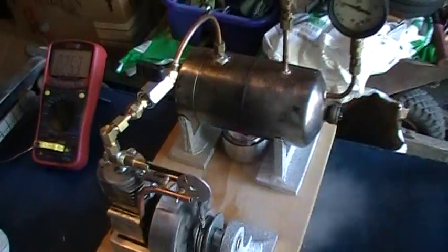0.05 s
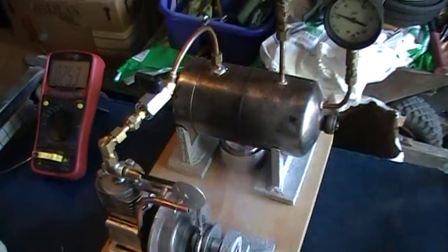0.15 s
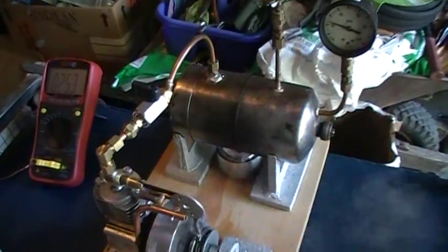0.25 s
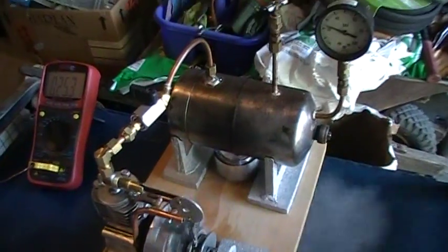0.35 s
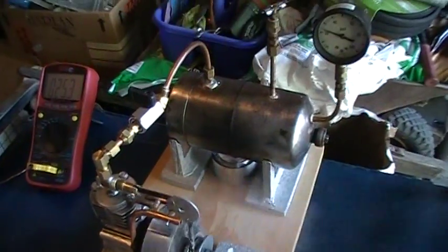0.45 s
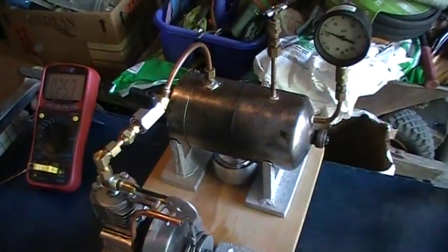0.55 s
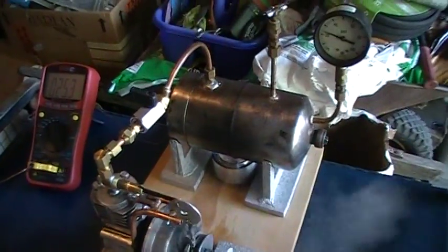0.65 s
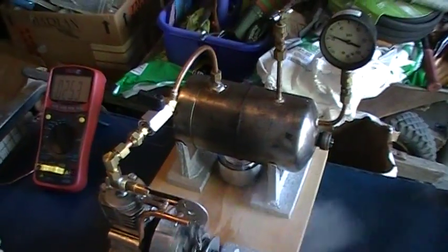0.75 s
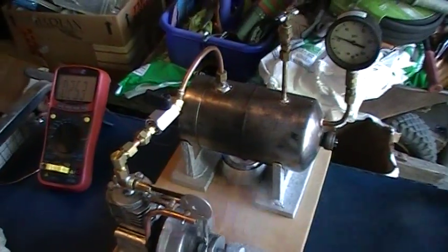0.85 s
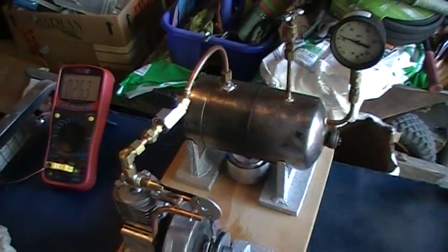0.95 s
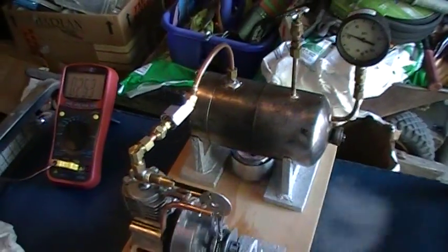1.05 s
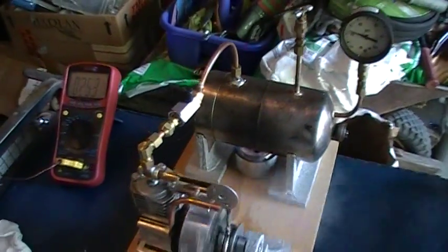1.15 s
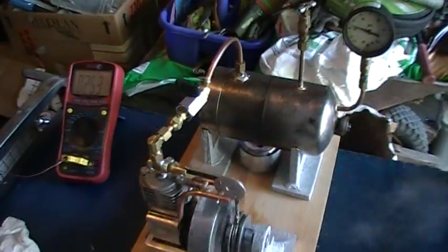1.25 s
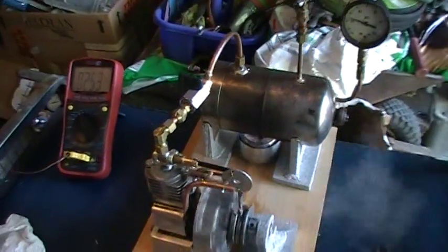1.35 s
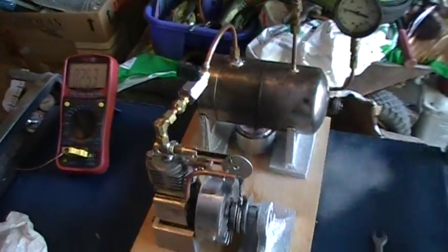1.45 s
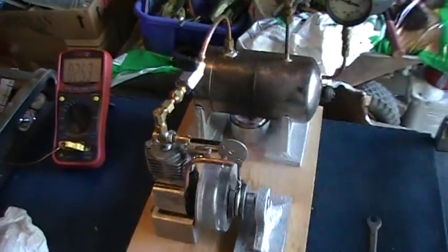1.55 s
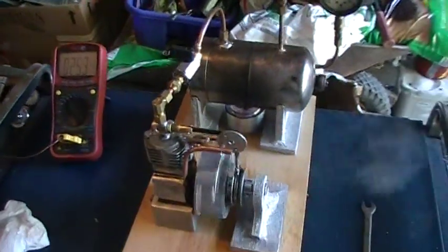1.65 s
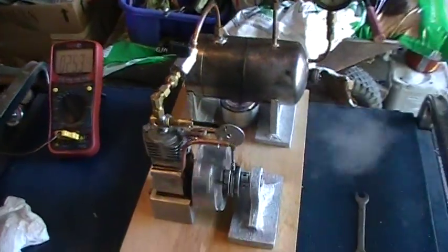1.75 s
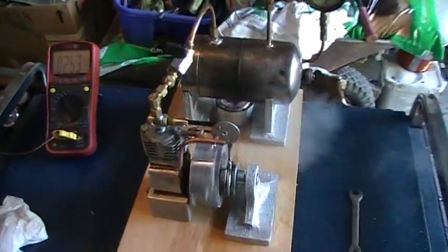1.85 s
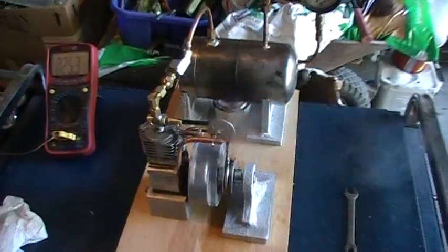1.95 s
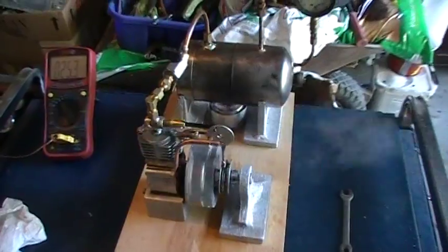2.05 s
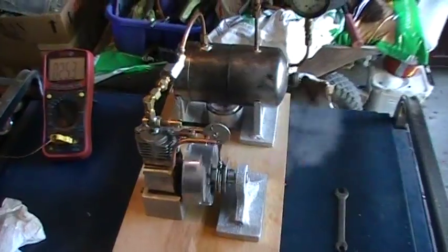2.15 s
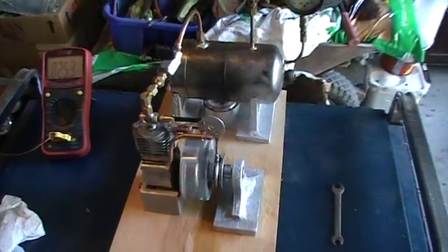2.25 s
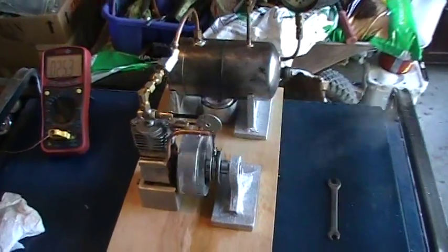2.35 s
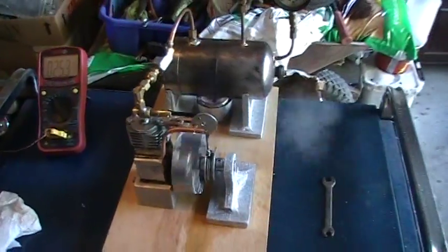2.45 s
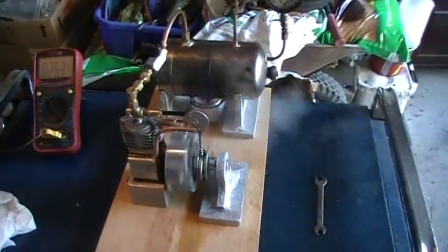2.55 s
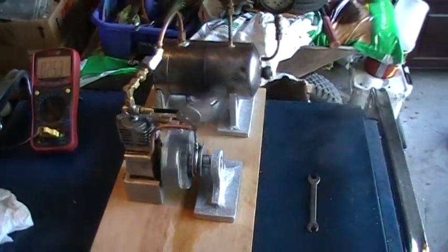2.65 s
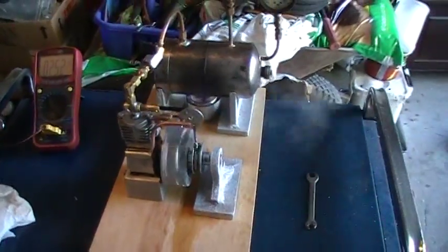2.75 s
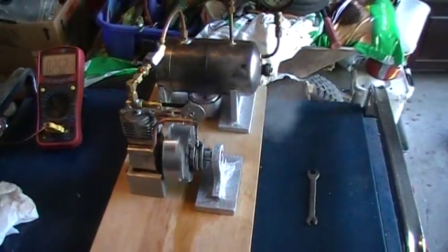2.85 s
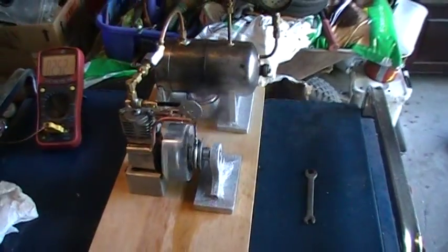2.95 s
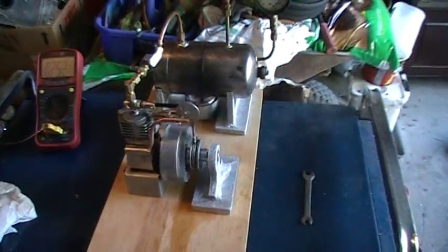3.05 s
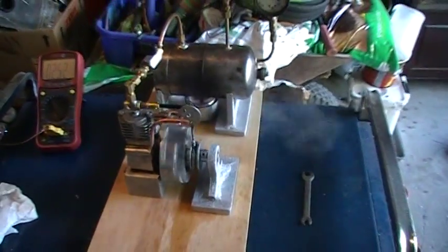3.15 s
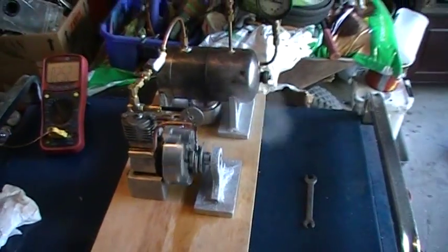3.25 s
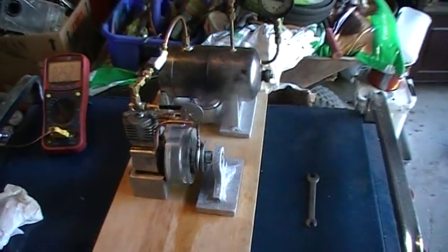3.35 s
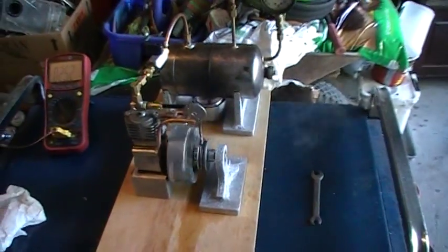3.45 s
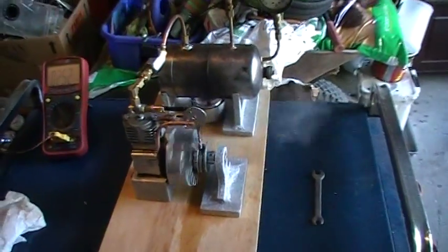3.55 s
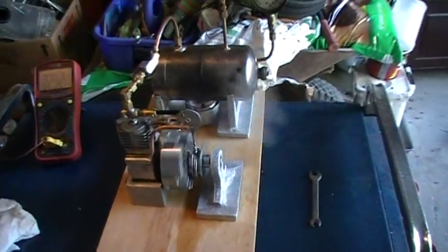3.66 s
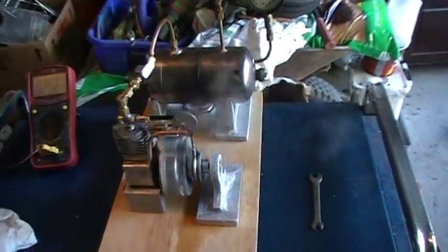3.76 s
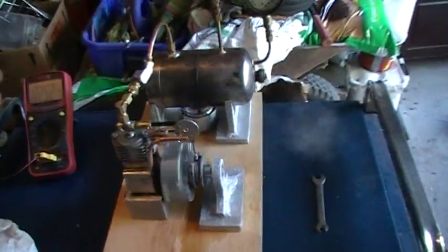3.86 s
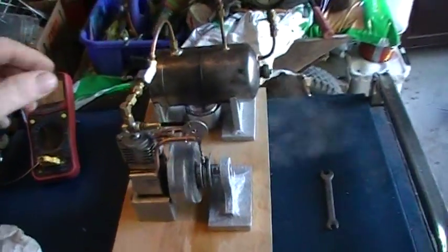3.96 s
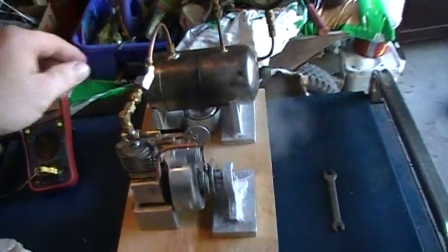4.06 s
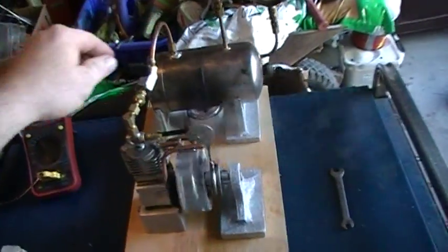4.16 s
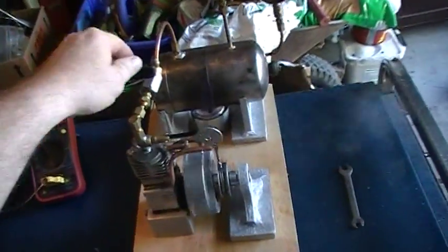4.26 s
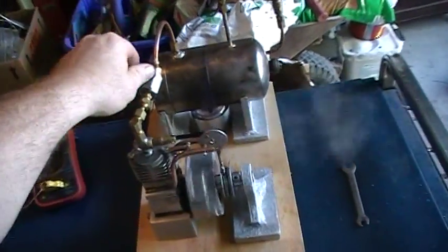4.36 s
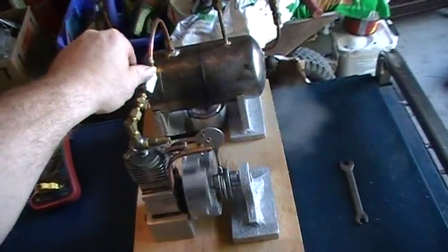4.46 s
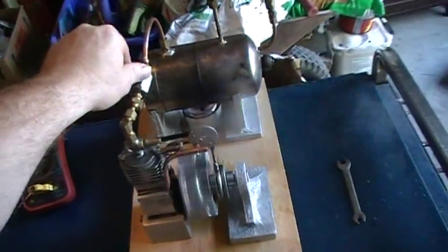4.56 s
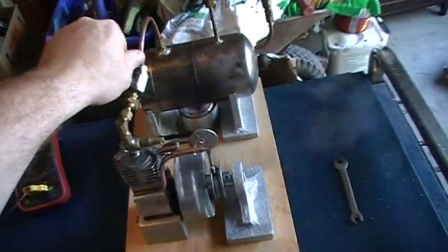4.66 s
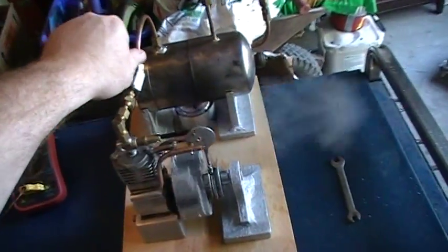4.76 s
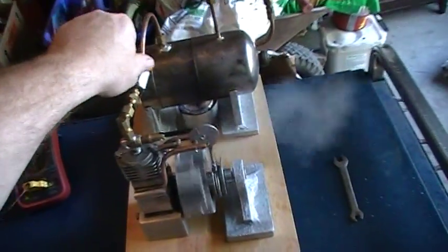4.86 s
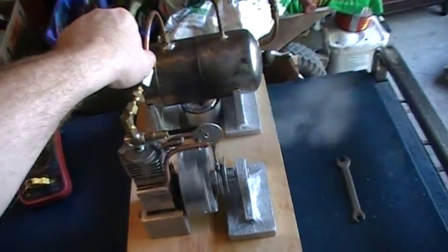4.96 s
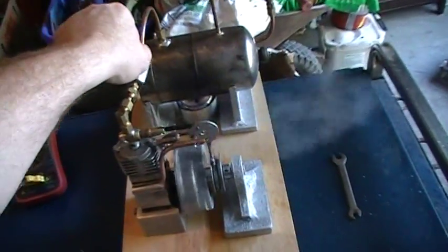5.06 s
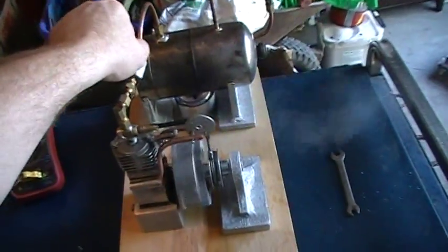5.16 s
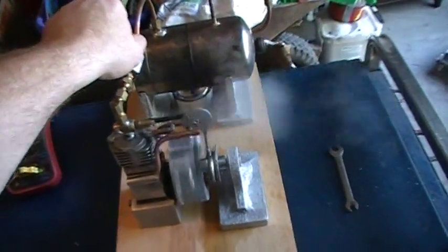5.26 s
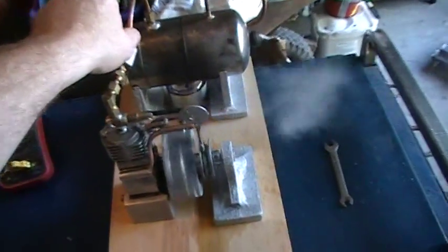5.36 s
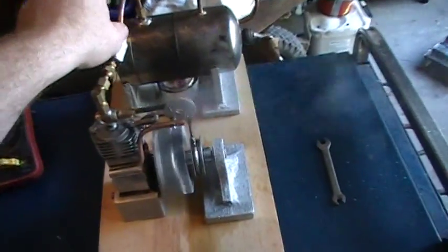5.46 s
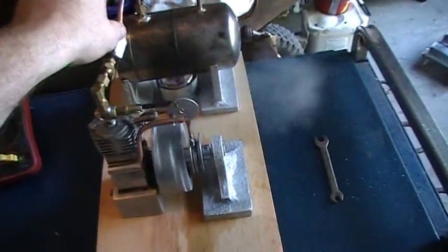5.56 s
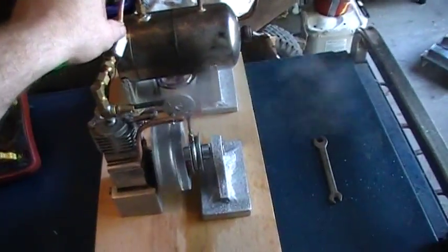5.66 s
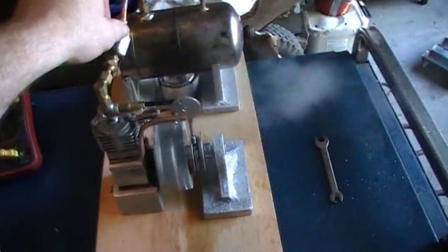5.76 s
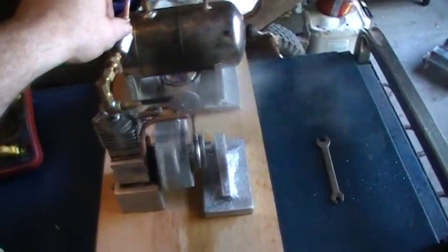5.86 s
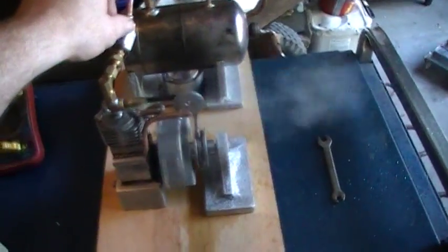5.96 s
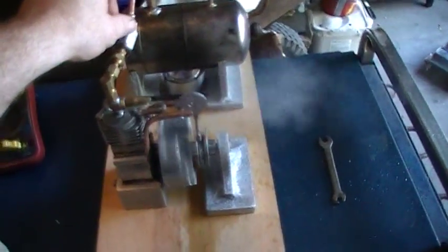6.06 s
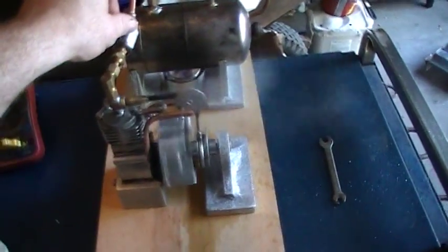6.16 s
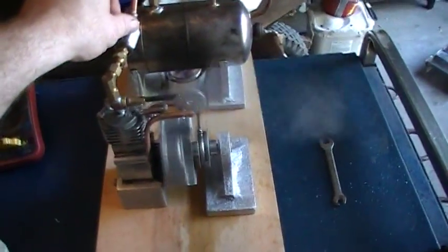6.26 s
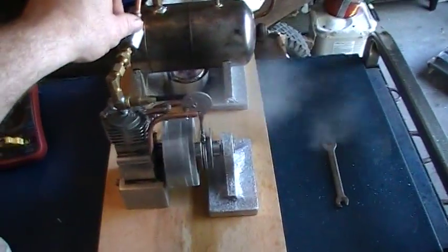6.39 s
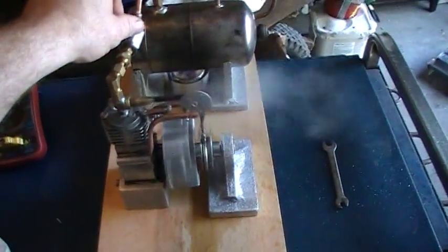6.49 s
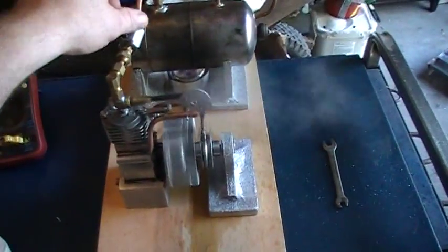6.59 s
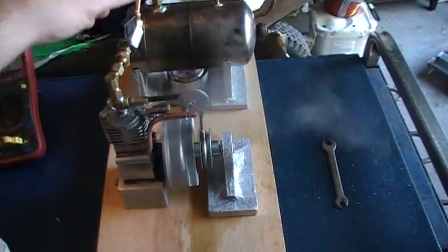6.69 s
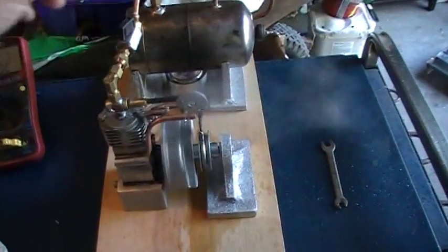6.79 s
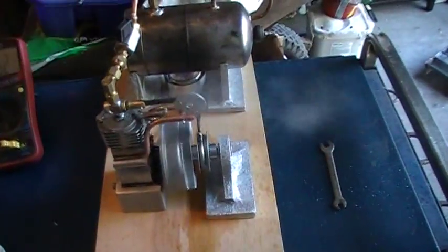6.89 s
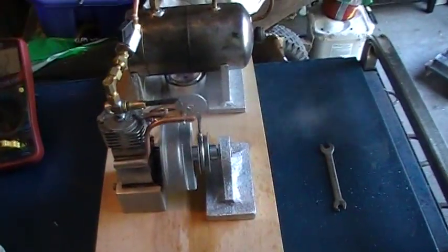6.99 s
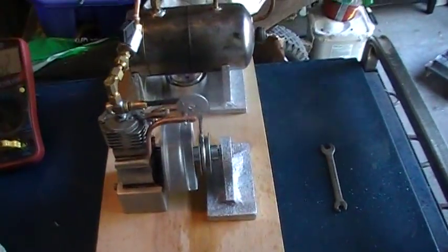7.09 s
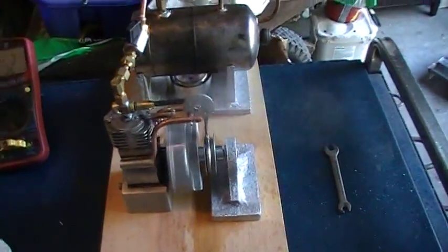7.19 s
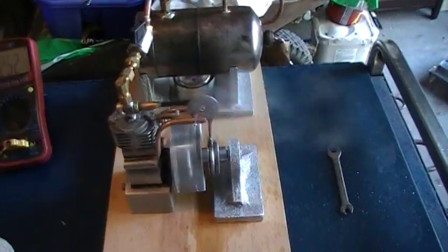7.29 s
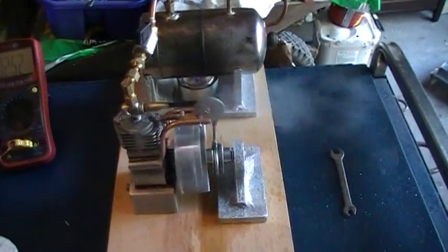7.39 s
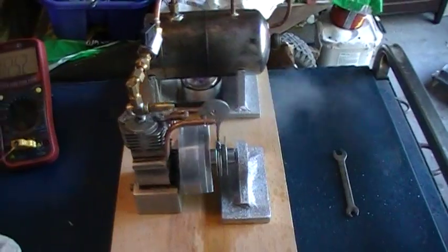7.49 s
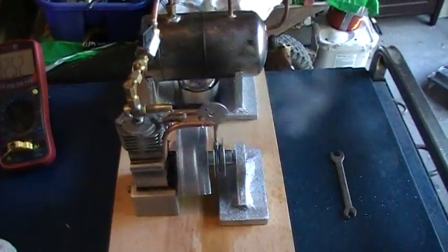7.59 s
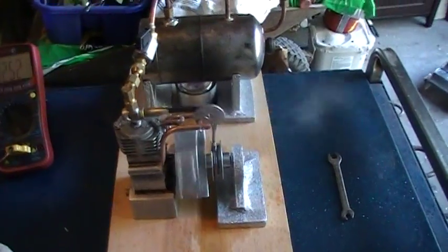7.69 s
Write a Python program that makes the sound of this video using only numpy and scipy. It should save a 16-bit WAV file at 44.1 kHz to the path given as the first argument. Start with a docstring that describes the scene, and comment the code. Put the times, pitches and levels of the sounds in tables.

```python
"""Chuffing steam is heard first: a one-cylinder engine on a bench turns seven times a second, then races to 22.
Each turn lets steam through the port in two humps of flow, which drive a wet turbulent jet and its whistle.
Impacts excite resonances as a valve tick and rod knocks; sliding friction gives the piston's rasp and hiss.
Condensate gurgles as short chirps at idle, and the bearings and crank shake the base board.
An early bench echo and a diffuse workshop tail answer, above the microphones' own faint rumble."""
import sys
import numpy as np
from scipy import signal
from scipy.fft import rfft, irfft, next_fast_len
from scipy.io import wavfile
from scipy.ndimage import map_coordinates

SR = 44100
rng = np.random.default_rng(int(sys.argv[2]) if len(sys.argv) > 2 else 0)


def pcm_store(signal):
    """Save signal as 16-bit PCM."""
    levels = np.round(np.clip(np.atleast_2d(signal), -1, 1) * 32767)
    wavfile.write(sys.argv[1], SR, levels.astype(np.int16).T)


N = 340893
TIME = np.arange(N) / SR
IDLE_TURNS_PER_S = 7.2
INLET_TURNS = .618  # inlet valve opening, in crank turns after the exhaust
CUTOFF_HZ = 15900

# The crank idles, falters as the cock is touched, then races: (time [s], speed [turns/s])
CRANK_SPEED = [(0.0, 7.176), (0.25, 7.119), (1.19, 7.091), (1.8, 7.396), (2.06, 7.037), (4.11, 7.614),
               (4.49, 7.285), (4.64, 5.541), (4.76, 8.699), (5.03, 11.821), (5.27, 13.746), (6.5, 18.706),
               (6.87, 19.834), (7.73, 21.906)]
# Strength of the exhaust steam: (time [s], relative level [dB])
STEAM_STRENGTH = [(0, -19.5), (1.5, -18.5), (2.3, -20), (3.0, -19), (4.4, -18.5), (5.2, -17.5),
                  (6.1, -17.5), (7.0, -18), (7.73, -18.5)]
# Strokes that push out little steam: (time [s], push-out level against a normal stroke [dB])
WEAK_STROKES = [(1.12, -2), (2.1, -1), (3.2, -5), (3.74, -5)]
# Spectrum of the jet noise: (frequency [Hz], relative density [dB per Hz])
JET_SPECTRUM = [(150, -30.5), (600, -8), (1400, -18), (2300, -13.5), (2900, -3), (3500, -6.5), (4300, -1.5),
                (5000, -9.5), (6800, -3.5), (8200, 2), (10200, 1.5), (12000, -8), (15800, -14.5)]
# Resonances of the wet exhaust passage: (frequency [Hz], width [Hz], relative level [dB])
PASSAGE_MODES = [(2900, 400, -8), (4400, 550, -4), (6000, 600, -7), (7900, 500, -3), (10400, 700, -1)]
# Resonances of the base board: (frequency [Hz], width [Hz], relative level [dB])
BOARD_MODES = [(100, 5.8, -21), (163.3, 13, 0.5), (212.7, 12.7, 4.5), (337, 33, -1.5), (434, 33, -13.5)]
# Resonances of the rod and crank pin: (frequency [Hz], width [Hz], relative level [dB])
ROD_MODES = [(570, 70, -3), (722, 60, -4), (870, 45, -2), (965, 140, 2), (1070, 70, -7)]
# Resonances of the cylinder: (frequency [Hz], width [Hz], relative level [dB])
CYLINDER_MODES = [(1331, 84, -4), (1507, 90, -5), (1652, 93, -5), (1882, 156, -3), (2046, 142, -4.5),
                  (2490, 156, -8), (2820, 156, -9.5), (4790, 1560, -14)]
# Resonances of the engine frame: (frequency [Hz], width [Hz], relative level [dB])
FRAME_MODES = [(560, 50, -5), (598, 45, -5.5), (718, 55, -1), (785, 35, -7), (870, 30, -9), (970, 80, -5),
               (1045, 60, -6)]
# Spectrum of the valve tick: (frequency [Hz], relative density [dB per Hz])
TICK_SPECTRUM = [(60, -55), (700, -30), (1500, -5), (2800, 7), (3600, -8), (4500, 3), (6500, -5.5),
                 (9200, 6), (12000, -5), (16000, -29)]
# Spectrum of the sliding hiss: (frequency [Hz], relative density [dB per Hz])
SLIDING_SPECTRUM = [(30, -66), (80, -21), (300, -2), (700, -2.5), (2200, 7), (3400, 0), (4600, -12),
                    (7000, -8.5), (10000, -5), (16000, -34)]
# Friction apart from what speed adds; it eases while the engine falters:
# (time [s], bearing rumble level [dB], piston rasp level [dB])
FRICTION = [(0, -45.5, -42.5), (1.2, -44.5, -43), (1.7, -43.5, -40), (2.6, -48.5, -43), (3.2, -46.5, -39.5),
            (3.9, -48.5, -42), (4.4, -42, -38.5), (4.64, -47.5, -43), (4.8, -45, -42), (6.5, -44.5, -40.5),
            (7.73, -43, -44)]
# Piston friction around one turn at idle: (crank angle [turns], relative level [dB])
RUBBING = [(0, 6), (.15, 4.5), (.28, 3), (.4, -4.5), (.58, -8.5), (.64, 7), (.78, -5.5), (.92, 3), (1, 4)]
# Loudest gurgles of condensate in the cylinder: (time [s], relative level [dB], frequency [Hz])
LOUD_GURGLES = [(0.135, -31.5, 1330), (0.654, -31, 1960), (1.121, -26.5, 2580), (1.772, -29, 1930),
                (1.935, -32, 1355), (3.158, -31.5, 1370), (3.324, -28, 1352), (4.53, -26, 1337),
                (4.687, -26.5, 1812)]
# Hum of the shaking base: (frequency [Hz], relative level of a crank harmonic there [dB])
HUM_RESPONSE = [(20, -48), (45, -35), (62, -20), (82, -9), (103, 0), (125, -11), (145, -7), (166, 5),
                (188, -6), (214, 3), (245, -7), (285, -11), (325, -7), (370, -11), (450, -11)]
# Decay of the workshop's reverberation: (frequency [Hz], 60 dB decay time [s])
ROOM_T60 = [(100, 0.063), (1000, 0.17), (5000, 0.3), (9000, 0.3), (15000, 0.18)]
# Breadth of the reverberation: (frequency [Hz], side against mid level [dB])
ROOM_WIDTH = [(100, 6), (300, 4), (700, -4.5), (2000, -11), (5000, -10.5), (8000, -10), (11000, 7.5),
              (15000, 3)]
# Spectrum of the microphones' own faint rumble: (frequency [Hz], relative density [dB per Hz])
SELF_NOISE_SPECTRUM = [(20, -13), (45, 2), (100, -1), (300, -5), (2000, -20), (16000, -34)]
# Colour of the microphone pair: (frequency [Hz], left minus right level [dB])
EAR_DIFFERENCE = [(40, -3), (90, -1.1), (450, -1.5), (850, 0.2), (1050, 2.5), (2000, -0.5), (3000, 2),
                  (5000, 0), (7300, -0.5), (8300, 4.5), (9600, -1), (10700, -1), (13000, -1)]


def from_db(db):
    """Amplitude ratio by the decibel law."""
    return 10 ** (np.asarray(db) / 20)


def rms_one(x):
    """Normalisation to unit root-mean-square amplitude."""
    return x / np.sqrt(np.mean(x ** 2) + 1e-20)


def read(rows, at):
    """Linear interpolation of every column of a table against its first."""
    first, *columns = np.transpose(rows)
    return [np.interp(at, first, c) for c in columns]


def at_hz(points, hz):
    """Linear interpolation of a spectrum on a log-frequency axis."""
    known_hz, values = np.transpose(points)
    return np.interp(np.log(hz + 1), np.log(known_hz), values)


def filtered(x, order, edge_hz, kind="low"):
    """Causal Butterworth filtering: a maximally flat pass band."""
    return signal.sosfilt(signal.butter(order, edge_hz, kind, fs=SR, output="sos"), x)


def coloured(x, spectrum):
    """Spectral shaping by multiplication in the frequency domain; rms 1."""
    size = next_fast_len(N)
    gain = from_db(at_hz(spectrum, np.fft.rfftfreq(size, 1 / SR)))
    return rms_one(irfft(rfft(x, size) * gain, size)[:N])


def drift(rate):
    """Slow random modulation: about `rate` new values a second, joined by lines; rms 1."""
    knots = np.arange(0, N / SR + 1, 1 / rate)
    return rms_one(np.interp(TIME, knots, rng.standard_normal(len(knots))))


def resonate(x, hz, width_hz):
    """A damped two-pole resonator with gain 1 at its peak."""
    r = np.exp(-np.pi * width_hz / SR)
    zeros = np.array([1, 0, -1]) * (1 - r * r) / 2
    poles = [1, -2 * r * np.cos(2 * np.pi * hz / SR), r * r]
    return signal.lfilter(zeros, poles, x + 1e-18)


def body(force, modes, vary_db):
    """Modal superposition: the share of each mode wanders with the point of contact."""
    total = 0
    for k, (hz, width_hz, db) in enumerate(modes):
        share = from_db(vary_db * drift(25))
        total = total + (-1) ** k * from_db(db) * resonate(force * share, hz, width_hz)
    return total


def clicks(times, db):
    """Ideal impacts: one single-sample impulse at each time."""
    out, at = np.zeros(N), np.round(times * SR).astype(int)
    inside = (at >= 0) & (at < N)
    out[at[inside]] = from_db(db)[inside]
    return out


def grains(per_s, spread_db):
    """Shot noise: random tiny impacts of uneven size and sign; rms 1."""
    sizes = from_db(spread_db * np.minimum(rng.exponential(1, N), 4))
    sizes = sizes * rng.choice([-1, 1], N)
    return rms_one(sizes * (rng.random(N) < per_s / SR))


def crank():
    """Rotation as integrated speed: turn starts, periods, angle [turns] and speed [octaves above idle]."""
    turns_per_s, = read(CRANK_SPEED, TIME)
    turns = np.cumsum(turns_per_s) / SR
    starts = np.interp(np.arange(int(turns[-1]) + 1), turns, TIME)
    periods = np.append(np.diff(starts), 1 / turns_per_s[-1])
    return starts, periods, turns % 1, np.log2(turns_per_s / IDLE_TURNS_PER_S)


def exhaust(flow, speed, jet_db=-3.5, spit_db=-7, sputter_db=0.65,
            whistle_db=1.0, whistle_db_per_octave=-3, roar_db=-19):
    """Jet turbulence: the flow through the port modulates a wet jet, its whistle and a roar."""
    flow = flow * from_db(sputter_db * (drift(600) - 1 / 2))
    # droplets of condensate crackle in the jet
    droplets = from_db(spit_db) * grains(per_s=2500, spread_db=-2.5)
    jet = coloured(rng.standard_normal(N) + droplets, JET_SPECTRUM)
    # water in the passage keeps changing the colour of the chuffs
    wet = rms_one(body(rng.standard_normal(N), PASSAGE_MODES, vary_db=3.0))
    jet = rms_one(jet + from_db(-5) * wet)
    # at speed the whistle fades and a lower roar grows
    tone = from_db(whistle_db + whistle_db_per_octave * speed) * whistle(speed)
    roar = rms_one(resonate(rng.standard_normal(N), hz=4170, width_hz=8100)) * np.maximum(speed, 0)
    return flow * (from_db(jet_db) * (jet + tone) + from_db(roar_db) * roar)


def port_flow(starts, periods, speed, blowdown_db=2.0, push_db=-0.47, push_db_per_octave=-2,
              blowdown_vary_db=.4, push_vary_db=0.3, leak_db=-22, leak_turns=0.18, lead_s=0.00082):
    """Periodic flow: a two-humped chuff each turn, slightly varied, with a dying leak past the valve."""
    flow, weak_db = np.zeros(N), np.zeros(len(starts))
    for s, db in WEAK_STROKES:
        weak_db[np.argmin(np.abs(starts - s))] = db
    chances = rng.standard_normal((len(starts), 2))
    for start, period, weak, chance in zip(starts, periods, weak_db, chances):
        near = slice(max(int((start - lead_s) * SR), 0), int((start + period) * SR))
        t, fast = TIME[near] - start + lead_s, max(np.interp(start, TIME, speed), 0)
        turn_s = 1 / (IDLE_TURNS_PER_S * 2 ** fast)
        first_gain = from_db(blowdown_db + blowdown_vary_db * chance[0])
        second_gain = from_db(push_db + push_db_per_octave * fast + push_vary_db * chance[1] + weak)
        leak = from_db(leak_db) * np.exp(-t / (leak_turns * turn_s))
        humps = first_gain * blowdown(t, turn_s, fast) + second_gain * push_out(t / turn_s, fast)
        flow[near] += humps + leak
    return flow * from_db(read(STEAM_STRENGTH, TIME)[0])


def blowdown(t, period, fast, attack_s=0.0044, hold_turns=0.069, hold_turns_per_octave=0.04, decay_s=0.0052):
    """Pressure relief at the opening port: attack, hold and exponential decay."""
    hold_s = (hold_turns + hold_turns_per_octave * fast) * period
    return np.clip(t / attack_s, 0, 1) * np.exp(-np.maximum(t - hold_s, 0) / decay_s)


def push_out(turns, fast, peak_turns=0.29, swell_turns=0.057, close_turns=0.027, late_turns_per_octave=0.033):
    """Displacement flow: the returning piston drives out the rest until the port closes on it."""
    past = turns - peak_turns - late_turns_per_octave * fast
    return np.exp(-(past / np.where(past < 0, swell_turns, close_turns)) ** 2 / 2)


def whistle(speed, centre_hz=9220, sag_hz_per_octave=60, waver_hz=260, waver_hz_per_octave=150, width_hz=520):
    """Narrow-band turbulence: the port's ragged whistle, its centre wavering at random; rms 1."""
    waver = (waver_hz + waver_hz_per_octave * np.abs(speed)) * drift(45)
    hz = centre_hz - sag_hz_per_octave * speed + waver
    noise = rng.standard_normal(N) + 1j * rng.standard_normal(N)
    turbulence = filtered(noise, 2, width_hz / 2)
    # a complex carrier shifts the band up to its centre
    return rms_one(np.real(turbulence * np.exp(2j * np.pi * np.cumsum(hz) / SR)))


def thumps(starts, speed, open_db=-15, rise_db=2.0, soft_hz=220, low_hz=70, board_db=5):
    """Impulse response: the pressure step at port opening radiates and rings the base board."""
    opening = clicks(starts, open_db + rise_db * np.interp(starts, TIME, speed))
    pulses = filtered(opening + 1e-18, 2, [low_hz, soft_hz], "band")
    return pulses + from_db(board_db) * body(opening, BOARD_MODES, vary_db=1)


def knocks(starts, periods, speed, knock_db=-0.5, inertia_db=4.5, clank_db=-7,
           return_turns=.455, return_db=1, chime_db=9):
    """Impact excitation: steam takes up the rod's slack with one bounce; each turn it also closes back,
    harder at speed."""
    slack_s, bounce_s, bounce_db = .004, .0042, -9
    fast = np.maximum(np.interp(starts, TIME, speed), 0)
    chance = rng.standard_normal((len(starts), 5))
    times = starts + INLET_TURNS * periods + slack_s + .0001 * chance[:, 0]
    # inertia makes the blow grow steeply with speed
    level_db = knock_db + inertia_db * fast ** 3 + 0.49 * chance[:, 1]
    bounces = clicks(times + bounce_s + .0001 * chance[:, 2], level_db + bounce_db)
    blows = clicks(times, level_db) + bounces
    thud = body(blows, ROD_MODES, vary_db=.5)
    return_times = starts + return_turns * periods + .0004 * chance[:, 3]
    returns = clicks(return_times, return_db + 9 * (fast - 1) + 2 * chance[:, 4])
    # the return blow sets the flywheel ringing
    chime = from_db(chime_db) * resonate(returns, 1954, 40)
    clank_force = from_db(clank_db) * blows * from_db(-7 * speed) + returns
    return thud + chime + body(clank_force, CYLINDER_MODES, vary_db=2.5)


def valve(starts, periods, speed, tick_db=-41, rise_db=10, tick_decay_s=0.0023):
    """Transient noise burst: the inlet valve snaps open with a short spit, harder at speed."""
    times = starts + INLET_TURNS * periods
    level_db = tick_db + rise_db * np.interp(times, TIME, speed) + rng.normal(0, 1.7, len(times))
    decay = np.exp(-1 / (tick_decay_s * SR))
    envelope = signal.lfilter([2], [1, -decay], clicks(times, level_db))
    return envelope * coloured(rng.standard_normal(N), TICK_SPECTRUM)


def running_gear(angle, speed):
    """Radiation efficiency: parts as small as piston and bearings radiate little bass."""
    return filtered(piston(angle, speed) + bearings(speed), 4, 130, "high")


def piston(angle, speed, rasp_db_per_octave=7, evening=0.57, rasp_top_hz=3500, hiss_db=-6, hiss_db_per_octave=9):
    """Sliding friction: rasp and hiss in the cylinder, louder and more even as the speed rises."""
    piston_db = read(FRICTION, TIME)[1]
    stroke_db = read(RUBBING, angle)[0] * (1 - evening * speed) + 2 * drift(70)
    contacts = grains(per_s=1500, spread_db=2.5) * from_db(stroke_db)
    scraping = body(contacts, CYLINDER_MODES, vary_db=0.0)
    rasp = from_db(rasp_db_per_octave * speed) * rms_one(filtered(scraping, 2, rasp_top_hz))
    hiss_gain = from_db(hiss_db + hiss_db_per_octave * speed + stroke_db / 2)
    hiss = hiss_gain * coloured(rng.standard_normal(N), SLIDING_SPECTRUM)
    return from_db(piston_db) * (rasp + hiss)


def bearings(speed, rumble_db_per_octave=6.5, drone_db=-53, drone_db_per_octave=-3, falter_db_per_octave=18):
    """Structure-borne friction: rumble in the frame and a board drone that drops as the crank falters."""
    rumble_gain = from_db(read(FRICTION, TIME)[0] + rumble_db_per_octave * speed)
    rumble = rms_one(body(grains(per_s=1800, spread_db=2.5), FRAME_MODES, vary_db=2.0))
    level_db = drone_db + drone_db_per_octave * speed + falter_db_per_octave * np.minimum(speed, 0)
    drone = rms_one(body(rng.standard_normal(N), BOARD_MODES, vary_db=1.0))
    return rumble_gain * rumble + from_db(level_db) * drone


def gurgles(squirts, gurgle_db=-1, length_s=0.0043, waver=0.045, grit=0.45):
    """Frequency modulation: water squeezed past the piston gives short wavering chirps with grit."""
    out, wobble = np.zeros(N), drift(350)
    rough = rms_one(body(rng.standard_normal(N), CYLINDER_MODES, vary_db=0))
    for s, db, hz in squirts:
        near = slice(max(int((s - .02) * SR), 0), int((s + .02) * SR))
        swell = np.exp(-((TIME[near] - s) / length_s) ** 2 / 2)
        chirp = np.sin(2 * np.pi * np.cumsum(hz * (1 + waver * wobble[near])) / SR)
        out[near] += from_db(db + gurgle_db) * swell * (chirp + grit * rough[near])
    return out


def small_gurgles(starts, periods, level_db=-36, spread_db=2, low_hz=1350, high_hz=2500, high_share=.35):
    """Random excitation: each slow power stroke squeezes out a squirt, mostly near the lowest resonance."""
    late, size, pitch = rng.random((len(starts), 3)).T
    times = starts + periods * (INLET_TURNS + (1 - INLET_TURNS) * late)
    hz = low_hz * (high_hz / low_hz) ** np.maximum(1 - pitch / high_share, 0)
    slow = periods > 1 / 10
    return np.transpose([times, level_db + spread_db * (2 * size - 1), hz])[slow]


def hum(angle, speed, idle_db=-80, db_per_octave=18.0, jolt_turns=0.202, scatter_cycles=0.12, count=18):
    """Forced vibration: harmonics of the unbalanced crank climb through the board's resonances."""
    level_db, turns_per_s = idle_db + db_per_octave * speed, IDLE_TURNS_PER_S * 2 ** speed
    total = 0
    for k in range(1, count + 1):
        gain = from_db(level_db + at_hz(HUM_RESPONSE, k * turns_per_s))
        cycles = k * (angle - jolt_turns) + scatter_cycles * rng.standard_normal()
        total = total + gain * np.cos(2 * np.pi * cycles)
    return total


def bench(x, echo_db=-8, delay_s=0.0009086, sway_s=.00012, ear_gap_s=.00001):
    """Early reflection: the bench top echoes with a swaying delay, giving shifting comb interference."""
    delay = delay_s + sway_s * drift(1.2)
    sides = []
    for side in (-1, 1):
        echo = map_coordinates(x, [(TIME - delay - side * ear_gap_s) * SR], order=3)
        sides.append(x + from_db(echo_db) * echo)
    return np.array(sides)


def workshop(x, treble_db=-12):
    """Diffuse reverberation: convolution with noise whose decay and stereo breadth vary by band."""
    t, size = TIME[:SR // 2], next_fast_len(N + SR // 2)
    edges, tail = np.geomspace(60, 16000, num=11), 0
    for low, high in zip(edges, edges[1:]):
        hz = np.sqrt(low * high)
        mid, side = filtered(rng.standard_normal((2, len(t))), 2, [low, high], "band")
        fade = from_db(-60 * t / at_hz(ROOM_T60, hz)) * np.clip((t - .003) / 0.009, 0, 1)
        gain = from_db(at_hz([(900, -12), (6000, treble_db)], hz)) / np.sqrt(np.sum(fade ** 2))
        spread = from_db(at_hz(ROOM_WIDTH, hz))
        stereo = (mid + spread * side * [[1], [-1]]) / np.sqrt(1 + spread ** 2)
        tail = tail + gain * fade * stereo
    return irfft(rfft(x, size) * rfft(tail, size), size)[:, :N]


def microphone_rumble(self_noise_db=-71):
    """Self-noise: each microphone's own faint rumble, independent on each side."""
    sides = [coloured(rng.standard_normal(N), SELF_NOISE_SPECTRUM) for side in range(2)]
    return from_db(self_noise_db) * np.array(sides)


def scene():
    """Superposition: the crank drives steam and machine; bench and room answer."""
    starts, periods, angle, speed = crank()
    steam = exhaust(port_flow(starts, periods, speed), speed) + valve(starts, periods, speed)
    water = gurgles([*LOUD_GURGLES, *small_gurgles(starts, periods)])
    blows = knocks(starts, periods, speed) + thumps(starts, speed)
    machine = running_gear(angle, speed) + blows + water
    # the small board radiates no deep bass
    machine = filtered(machine, 3, 75, "high")
    heard = bench(steam) + machine + workshop(steam + machine) + hum(angle, speed)
    return heard + microphone_rumble()


def record(dry):
    """Receiver response: two capsules differ slightly in colour; the top is cut steeply."""
    size = next_fast_len(N)
    lean_db = at_hz(EAR_DIFFERENCE, np.fft.rfftfreq(size, 1 / SR)) / 2
    heard = irfft(rfft(dry, size) * from_db([lean_db, -lean_db]), size)[:, :N]
    return signal.sosfilt(signal.ellip(10, .2, 80, CUTOFF_HZ, fs=SR, output="sos"), heard)


dry = scene()
out = record(dry)
pcm_store(out)
```